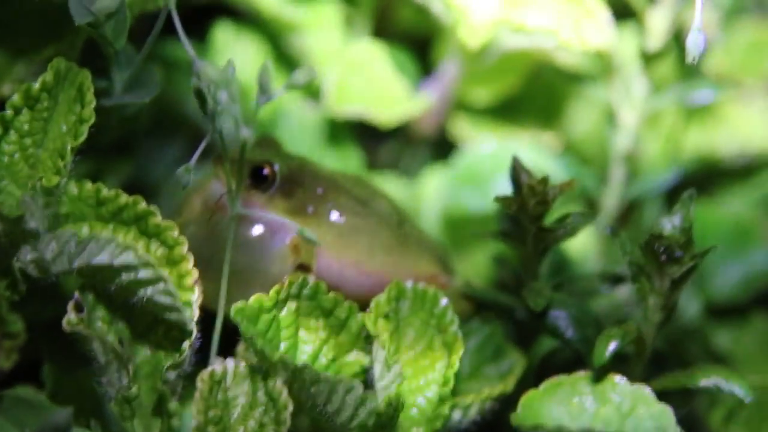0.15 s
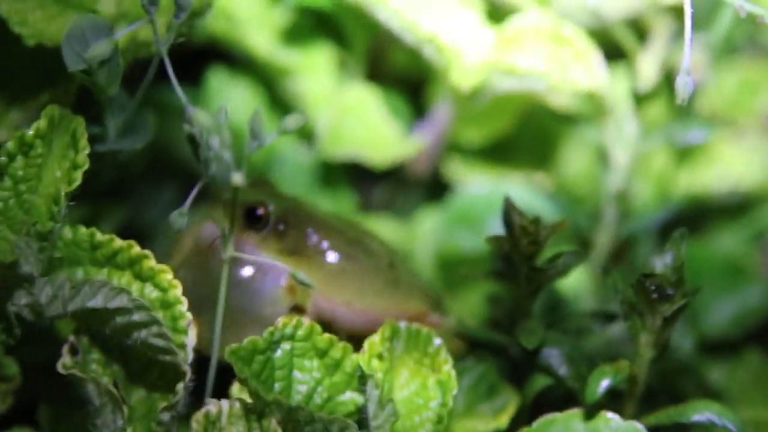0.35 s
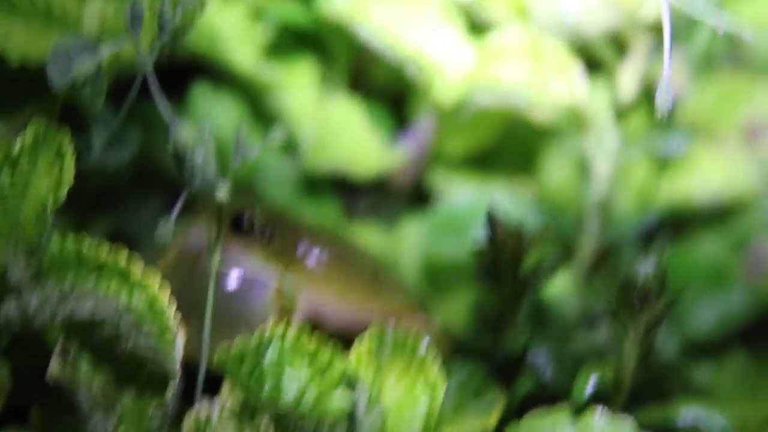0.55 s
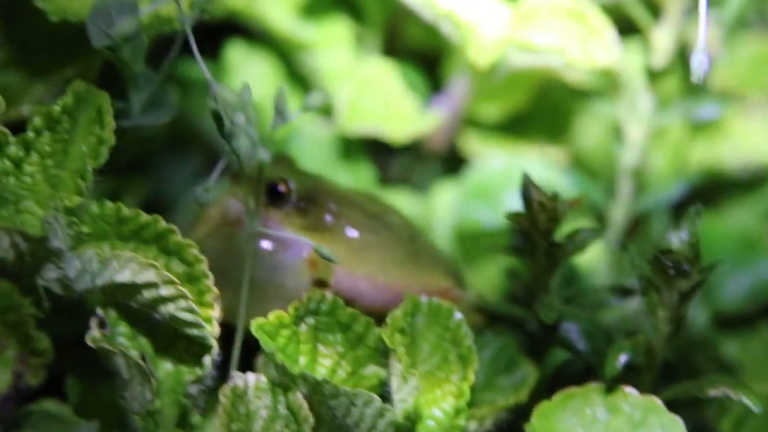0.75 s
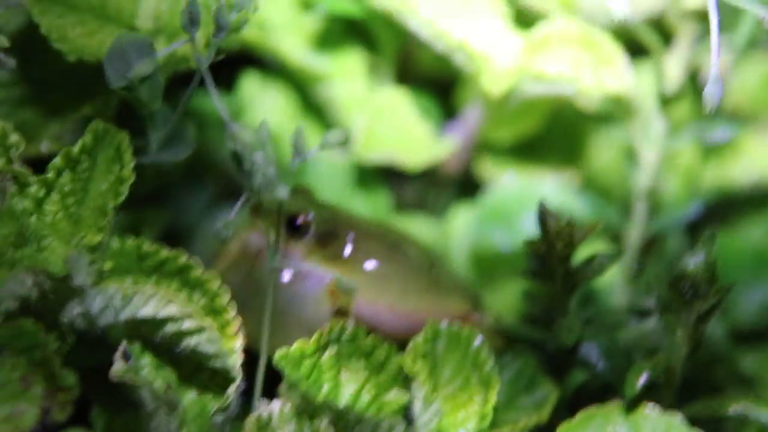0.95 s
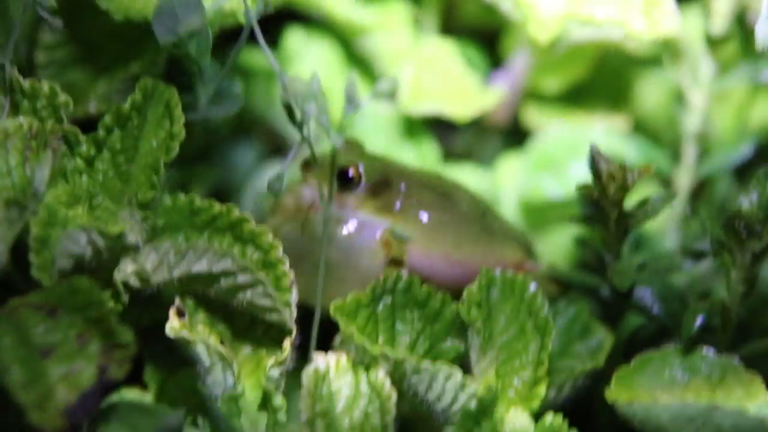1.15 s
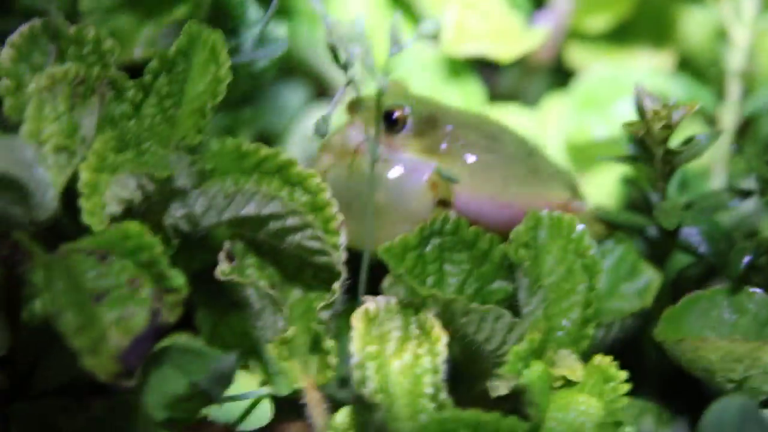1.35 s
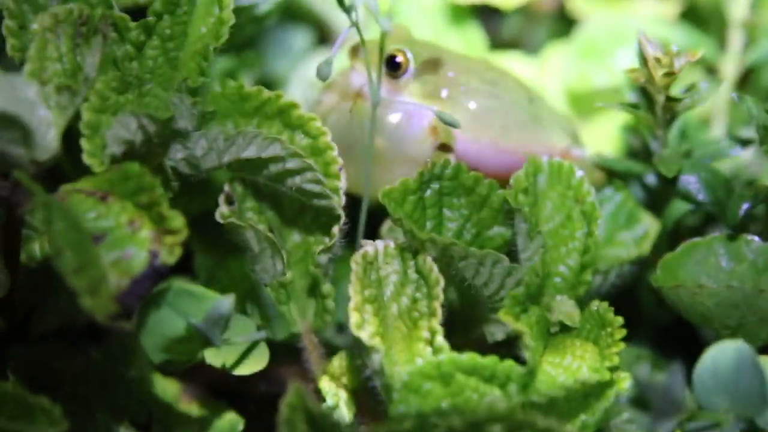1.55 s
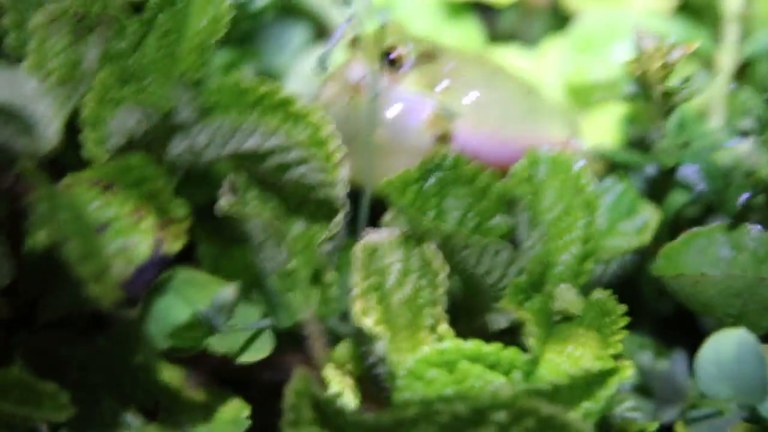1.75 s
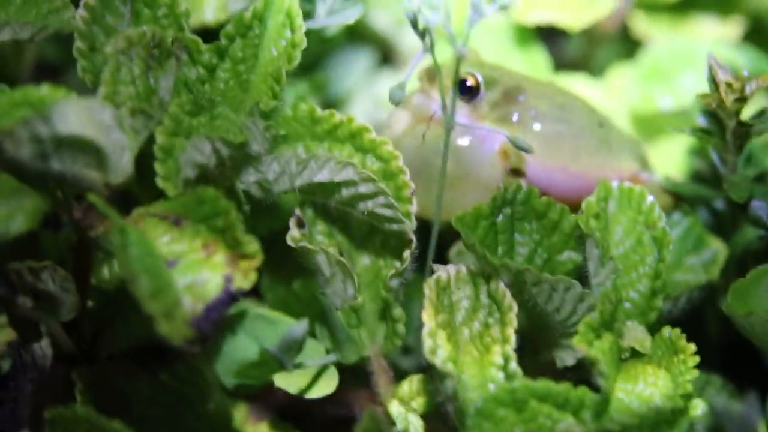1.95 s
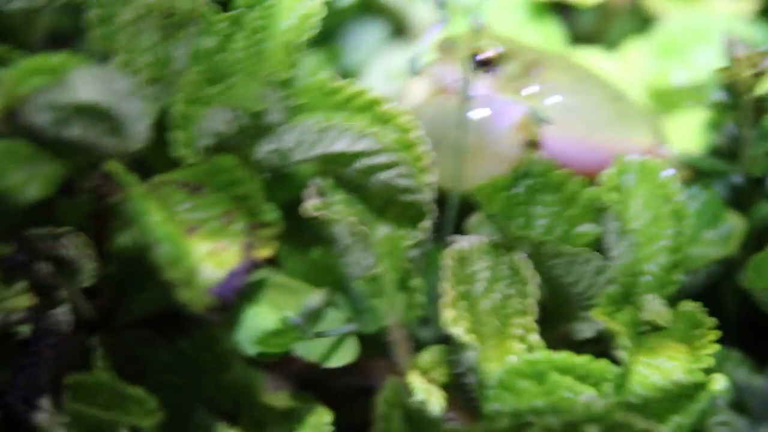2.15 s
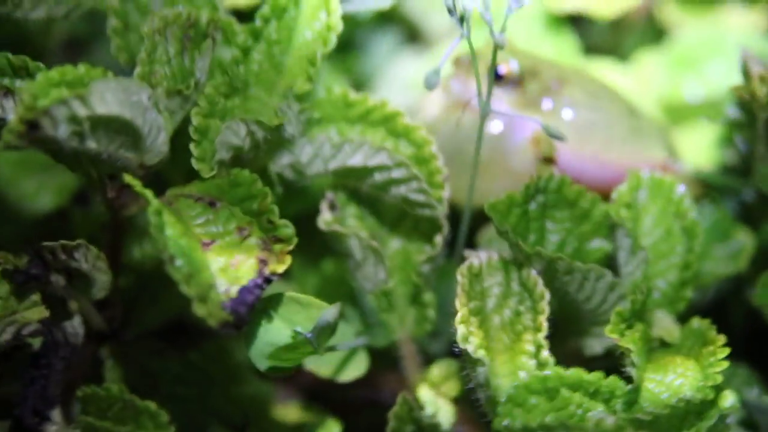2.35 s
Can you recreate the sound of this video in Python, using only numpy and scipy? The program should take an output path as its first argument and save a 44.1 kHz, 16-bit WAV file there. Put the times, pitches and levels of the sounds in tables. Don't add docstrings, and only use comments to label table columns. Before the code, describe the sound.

Near the microphone, a frog clicks hard, the first click distorting and making the background dip. Creaky snaps follow, then the background swells back with leaf rustle, a low toad croak and an accelerating distant frog rattle.

```python
import sys
import numpy as np
from scipy import signal
from scipy.io import wavfile
from scipy.ndimage import uniform_filter1d

SR = 44100
rng = np.random.default_rng(int(sys.argv[2]) if len(sys.argv) > 2 else 0)


def to_linear_factor(level_db):
    exponent = np.asarray(level_db, float) / 20
    return 10 ** exponent


def to_wav(sig):
    pcm = np.clip(np.atleast_2d(sig), -1, 1) * 32767
    pcm = np.round(pcm).astype(np.int16)
    wavfile.write(sys.argv[1], SR, pcm.T)


N = 110250
T = np.arange(N) / SR

# start in seconds, length in seconds, level in dB, pitch in Hz, pulse gap in ms.
LONG_CLICK = (.2493, .0518, 29, 2845, 3.19)
RINGING_CLICKS = [
    (.5203, .025, 28.5, 2815, 3.28),
    (.8175, .020, 25.5, 2782, 3.15),
]
CRISP_CLICKS = [
    (.5673, .027, 29, 2790, 3.1),
    (.8433, .0235, 28, 2765, 3.09),
]
NEIGHBOUR_CLICK = (.393, 0.029, 18.1, 2706, 3.9)
SINGLE_PULSES = [
    (0.3399, .002, 10.2, 2700, 3.6),
    (.438, .002, 0.9, 2696, 3.6),
]
TURNED_CLICKS = [
    (1.2859, 0.0052, 1.1, 2580, 6.9),
    (1.3275, 0.02, 12.5, 2561, 3.4),
]
# start in seconds, level in dB,
# pitch in Hz.
FAR_CLICKS = [(1.466, -22.5, 2500), (1.547, -21, 2270), (2.036, -21, 2476), (2.12, -27, 2790),
              (2.19, -24, 2920), (2.27, -23, 2870), (2.299, -27.5, 3050)]
# multiple of the pitch, level in dB.
OVERTONES = [(1.95, -35), (3.0, -42), (3.9, -48), (5, -49)]
# centre in Hz, width in Hz, level in dB.
RASP_BANDS = [(3750, 500, -4), (4920, 500, -1), (7374, 1100, -5), (10000, 1600, -7.5), (12600, 400, -13),
              (14800, 380, -15)]
SAC_WIDTH_HZ = 1300
LOW_FADE_DB_PER_S = 400

# start in seconds, level in dB.
CREAKS = [(0.616, -14), (0.644, -16), (0.672, -13.5), (0.698, -12), (0.716, -11.5), (.734, -10),
          (0.754, -8.5), (.774, -8.5), (.796, -7.5), (0.882, -30.5), (0.9, -25), (0.916, -15.5),
          (.933, -19), (.947, -19), (.959, -17.5), (0.971, -19), (.982, -9), (.990, -14.5), (.998, -10.5)]
# centre in Hz, width in Hz, level in dB.
CREAK_BODY = [(2313, 270, -5.5), (2080, 520, -20.5), (3820, 310, -21.5), (9400, 2200, -33.5)]

# time in seconds, snaps so far.
RATCHET_COUNT = [(1.848, 0), (1.945, 4), (2.090, 10), (2.114, 11), (2.200, 15), (2.344, 22), (2.361, 23),
                 (2.389, 25), (2.421, 27), (2.491, 31)]
# time in seconds, level in dB.
RATCHET_LEVEL = [(1.85, -22), (2.1, -18.5), (2.3, -16.5), (2.5, -11)]
# centre in Hz, width in Hz, level in dB.
RATCHET_BODY = [(1870, 305, 8), (2745, 710, -4.5), (3780, 690, -11)]

# time in seconds, throbs so far.
THROB_COUNT = [(-.03, 0), (.015, 1), (.147, 4), (.21, 6), (.25, 7), (.725, 16), (.874, 19), (.980, 21),
               (1.260, 27), (1.420, 31), (1.57, 35), (1.655, 36), (1.74, 37), (1.803, 38), (1.855, 39),
               (2.010, 42), (2.245, 47), (2.480, 52), (2.53, 53)]
# time in seconds, level in dB.
TOAD_EFFORT = [(0, -30), (.25, -32.5), (.3, -52.5), (.68, -50), (.75, -34.5), (1, -31.5), (1.2, -27),
               (1.4, -36), (1.5, -50.5), (1.64, -55.5), (1.74, -43.5), (1.9, -39), (2.1, -35), (2.5, -36)]
# centre in Hz, width in Hz, level in dB.
TOAD_THROAT = [(535, 150, -12.5), (1045, 240, -2.5), (1240, 150, -14.5), (1427, 120, 5), (1700, 640, -11.5),
               (2680, 520, -17)]
# centre in Hz, width in Hz, level in dB.
TOAD_BOOM = [(527, 32, -13), (1051, 40, -16), (1425, 30, -8)]
TOAD_PULSES_PER_S, TOAD_ROUGH = 125, 0.55
THROB_DUTY, THROB_GAP_DB = 0.8, -15

# start in seconds, level in dB, dullness from 0 to 1.
TICKS = [(0.028, -24, 0.47), (0.107, -31, 0.56), (0.235, -26, 0.5), (.292, -14, 0.9), (.35, -31, 0.6),
         (.357, -35, 0.4), (0.43, -23, .4), (.472, -30.5, .7), (0.51, -23, 0.8), (1.067, -32, 0.5),
         (1.078, -31, 0.4), (1.149, -37, 0.54), (1.229, -24.5, 0.9), (1.242, -30, 0), (1.409, -39, 0.33),
         (0.563, -11, 0.6), (0.606, -23, 0.97), (1.274, -27, 0.2), (1.283, -16.5, 0.9), (1.307, -25, 0.7),
         (1.311, -19.5, 0.9), (1.387, -28, 0.32), (1.468, -26, 0.25), (1.546, -27, 0.6),
         (2.037, -38.5, 0.4), (2.111, -32.5, 0.4), (2.124, -34.5, 0.6), (2.187, -32.5, 0.66),
         (2.267, -33, 0.34), (2.347, -33, 0.5)]
# time in seconds, level in dB.
RUSTLE_LEVEL = [(1.45, -66), (1.6, -45), (1.7, -43.5), (1.755, -47.5), (1.8, -39.5), (1.84, -50),
                (1.9, -52.5), (2, -66)]
BRUSH_S, BRUSH_LENGTH_S, BRUSH_DB = 1.645, .1, -39

# start in seconds, length in seconds, level in dB, start, lowest and end pitch in Hz.
SQUEAKS = [
    (1.03, .058, -51, 12900, 12600, 14700),
    (1.16, .052, -50, 13200, 10450, 10900),
    (2.189, 0.055, -48.5, 12300, 10900, 13800),
    (2.347, 0.048, -48.5, 12200, 10900, 12600),
]

# centre in Hz, width in Hz, level in dB.
HUM_BANDS = [(2550, 700, -48), (5160, 450, -63), (6800, 1000, -62), (11700, 1000, -65)]
# frequency in Hz, density in dB per Hz.
AIR_COLOUR = [(30, -22), (100, -3.5), (220, -1.5), (400, -10.5), (1500, -13.5), (3500, -28.5),
              (9000, -31.5), (16000, -41.5)]
AIR_DB = -42.5
ECHO_T60_S, ECHO_DB = 0.41, -32.5

# time in seconds, gain in dB.
RECORDER_GAIN = [(.2546, -3.5), (.2562, -25.5), (.272, -24), (.3, -27.5), (.62, -27), (1.05, -27),
                 (1.3, -18), (1.55, -15.5), (1.8, -8.5), (2.05, -1)]
EDGE_HZ = 16000


def evened(x):
    return x / np.sqrt(np.mean(x ** 2) + 1e-20)


def curve(points):
    return np.interp(T, *np.transpose(points))


def add(mix, s, sound):
    part = mix[round(s * SR):][:len(sound)]
    part += sound[:len(part)]


def resonate(x, hz, width):
    turn = np.exp(2j * np.pi * hz * np.arange(len(x)) / SR)
    r = np.exp(-np.pi * width / SR)
    return 2 * (turn * signal.lfilter([1 - r], [1, -r], x / turn + 1e-18)).real


def body(x, peaks):
    out = 0
    for k, (hz, width, db) in enumerate(peaks):
        out = out + (-1) ** k * to_linear_factor(db) * resonate(resonate(x, hz, width), hz, 2 * width)
    return out


def snap(peaks):
    impulse = 1. * (np.arange(900) == 0)
    ring = body(body(impulse, [(2780, 4600, 0)]), peaks)
    return ring / abs(ring).max()


def click(row, ring_ms, rise_ms, ring_db, accent_db, fade_db, last_db, slip, glide, low_db, rasp_db, jitter,
          slowing_ms, over_db, climb, late_ms, low_ratio=.81):
    start, length, level_db, hz, gap_ms = row
    direct, puffs, through_sac = np.zeros((3, round((length + .05) * SR)))
    t = np.arange(1200) / SR
    u = t * 1000 / rise_ms
    ring = (1 - np.exp(-u ** 3)) * np.exp(-t * 1000 / ring_ms)
    shape = (u * np.exp(1 - u)) ** 3 + to_linear_factor(ring_db) * ring
    chance = rng.standard_normal((24, 3))
    k = np.arange(24)
    times = (k * gap_ms + slowing_ms * k ** 2) / 1000
    times = list(times[times < length])
    levels = [fade_db * (s / length) ** 1.1 - accent_db * (s > 0) for s in times]
    times.append(times[-1] + late_ms / 1000)
    levels.append(last_db)
    for n, s, db, (a, b, c) in zip(k, times, levels, chance):
        later = s > 0
        f = hz * (1 + 0.041 * jitter * a + glide * (s / 0.039 - .5))
        at = round((s + later * 0.0018 * jitter * c) * SR) / SR
        phase = 2 * np.pi * (f * t + hz * at + climb * at ** 2 / 2 + slip * n + 0.17 * jitter * a)
        edge = sum(to_linear_factor(d + over_db) * np.sin(m * phase) for m, d in OVERTONES)
        edge = edge + to_linear_factor(low_db - LOW_FADE_DB_PER_S * s) * np.sin(low_ratio * phase)
        size = to_linear_factor(db + 1.5 * jitter * b * later) * shape / shape.max()
        add(through_sac if later else direct, at, size * np.sin(phase))
        add(direct, at, size * edge)
        add(puffs, s, size)
    rasp = evened(body(rng.standard_normal(5000), RASP_BANDS))[:len(puffs)]
    sac = body(through_sac, [(hz, SAC_WIDTH_HZ, 0)])
    return start, to_linear_factor(level_db) * (direct + sac + to_linear_factor(rasp_db) * puffs * rasp)


def reed_frogs():
    out = np.zeros(N)
    for row in RINGING_CLICKS:
        add(out, *click(row, ring_ms=4.34, rise_ms=0.81, ring_db=-2, accent_db=10, fade_db=-13.5, last_db=-57,
                        late_ms=7.8, low_db=-24.5, rasp_db=-37.5, over_db=-5.5, slip=0, climb=2000,
                        glide=.006, jitter=.06, slowing_ms=.004))
    add(out, *click(LONG_CLICK, ring_ms=1.9, rise_ms=0.83, ring_db=-7.5, accent_db=8.5, fade_db=-14.0,
                    last_db=-26, late_ms=6.4, low_db=-28.5, rasp_db=-42.5, over_db=2.5, slip=-.18,
                    climb=2700, glide=.012, jitter=.12, slowing_ms=.012))
    for row, late_ms in zip(CRISP_CLICKS, (5.7, 8.6)):
        add(out, *click(row, ring_ms=1.7, rise_ms=0.89, ring_db=-1, accent_db=7.5, fade_db=-15.5, last_db=-26,
                        late_ms=late_ms, low_db=-34, rasp_db=-37.5, over_db=-1.0, slip=.19, climb=0,
                        glide=.003, jitter=.1, slowing_ms=.012))
    add(out, *click(NEIGHBOUR_CLICK, ring_ms=5.2, rise_ms=1.27, ring_db=-8, accent_db=0, fade_db=-10.5,
                    last_db=-44, late_ms=6.5, low_db=-11, rasp_db=-33.5, over_db=3.5, slip=.12,
                    climb=13900, glide=.012, jitter=.2, slowing_ms=-.07))
    for row in SINGLE_PULSES:
        add(out, *click(row, ring_ms=3.1, rise_ms=0.95, ring_db=5, accent_db=3, fade_db=0, last_db=-41,
                        late_ms=9, low_db=-9.5, rasp_db=-30, over_db=0, slip=0, climb=0,
                        glide=0, jitter=.2, slowing_ms=0))
    for row, low_db in zip(TURNED_CLICKS, (-3, -11)):
        add(out, *click(row, ring_ms=5.5, rise_ms=1.08, ring_db=2, accent_db=8, fade_db=-4, last_db=-33,
                        late_ms=8, low_db=low_db, rasp_db=-36, over_db=-24, slip=0, climb=3500,
                        glide=.015, jitter=.2, slowing_ms=0, low_ratio=.74))
    for s, db, hz in FAR_CLICKS:
        row = (s, .011, db, hz, 3.3)
        add(out, *click(row, ring_ms=3.1, rise_ms=0.67, ring_db=3.5, accent_db=2, fade_db=-25, last_db=-25,
                        late_ms=6.6, low_db=-20, rasp_db=-30, over_db=0, slip=.2, climb=0,
                        glide=0, jitter=1, slowing_ms=0))
    return out


def creaks():
    train = np.zeros(N)
    for s, db in CREAKS:
        add(train, s, to_linear_factor([db]))
    creak = snap(CREAK_BODY[:1] + CREAK_BODY[2:])
    for s in (.002, .0068):
        add(creak, s, to_linear_factor(-5.0) * snap(CREAK_BODY[1:2]))
    sharper = [(hz * 1.017, width, db) for hz, width, db in CREAK_BODY[:1]]
    add(creak, .0045, snap(sharper))
    return signal.oaconvolve(train, creak)[:N]


def ratchet():
    starts = np.diff(np.floor(curve(RATCHET_COUNT)), prepend=0) > 0
    first = np.arange(N) == round(RATCHET_COUNT[0][0] * SR)
    train = starts + 1 * first
    return signal.oaconvolve(train * to_linear_factor(curve(RATCHET_LEVEL)), snap(RATCHET_BODY))[:N]


def toad():
    phase = curve(THROB_COUNT) % 1
    new_throb = np.diff(phase, prepend=0) < 0
    gate = uniform_filter1d(to_linear_factor(np.where(phase < THROB_DUTY, -4 * phase, THROB_GAP_DB)), size=60)
    wander = evened(uniform_filter1d(rng.standard_normal(N), size=400))
    turns = np.cumsum(TOAD_PULSES_PER_S * (1 + .25 * wander)) / SR
    pulses = np.diff(np.floor(turns), prepend=0) + new_throb
    pulses = pulses * to_linear_factor(1.3 * rng.standard_normal(N))
    puffs = np.exp(-(turns % 1) / .5) * rng.standard_normal(N)
    drive = (1 - TOAD_ROUGH) * evened(pulses) + TOAD_ROUGH * evened(puffs)
    strikes = 1. * new_throb
    boom = 0
    for hz, width, db in TOAD_BOOM:
        boom = boom + to_linear_factor(db) * evened(resonate(resonate(strikes, hz, width), hz, 8 * width))
    return to_linear_factor(curve(TOAD_EFFORT)) * (evened(body(gate * drive, TOAD_THROAT)) + boom)


def leaves():
    out, t = np.zeros(N), np.arange(500) / SR
    decay = np.minimum(t / .0005, 1) * np.exp(-t / .002)
    for s, db, dull in TICKS:
        noise = rng.standard_normal(500)
        bright_part = (1 - dull) * body(noise, [(6800, 4100, 2.6)])
        dull_part = dull * 2 * body(noise, [(3600, 2400, 0)])
        add(out, s, to_linear_factor(db) * evened(bright_part + dull_part) * decay)
    clumps = evened(uniform_filter1d(rng.standard_normal(N), size=150))
    grain = to_linear_factor(3 * clumps) * rng.standard_normal(N)
    rustle = evened(body(grain, [(8860, 3100, 2.5), (3000, 3000, 2), (11800, 4400, -4.5)]))
    brush = body(rng.standard_normal(round(BRUSH_LENGTH_S * SR)), [(8300, 2000, 0)])
    add(out, BRUSH_S, to_linear_factor(BRUSH_DB) * evened(brush) * np.hanning(len(brush)))
    return out + to_linear_factor(curve(RUSTLE_LEVEL)) * rustle


def squeaks():
    out = np.zeros(N)
    for start, length, db, start_hz, low_hz, end_hz in SQUEAKS:
        u = np.arange(0, 1, 1 / (length * SR))
        fall = (start_hz - low_hz) * np.clip(1 - u / 0.62, 0, 1) ** 2
        rise = (end_hz - low_hz) * np.clip((u - .35) / 0.7, 0, 1) ** 2
        tone = np.sin(2 * np.pi * np.cumsum(low_hz + fall + rise) / SR)
        flutter = evened(uniform_filter1d(rng.standard_normal(4000), size=60))[:len(u)]
        add(out, start, to_linear_factor(db) * np.sin(np.pi * u ** 1.1) * (1 + 0.52 * flutter) * tone)
    return out


def night():
    hz = np.fft.rfftfreq(1024, 1 / SR)
    a, b, patches = rng.standard_normal((N // 256 + 5, 513, 3)).T
    patches = uniform_filter1d(patches, size=10, axis=0)
    patches = evened(uniform_filter1d(patches, size=8, axis=1))
    colour_hz, colour_db = np.transpose(AIR_COLOUR)
    colour = np.interp(np.log(hz + 1), np.log(colour_hz), colour_db)[:, None]
    spectrum = (a + 1j * b) * to_linear_factor(colour + 2 * patches)
    air = signal.istft(spectrum, nperseg=1024, noverlap=768)[1][:N]
    out = to_linear_factor(AIR_DB) * evened(air)
    for band in HUM_BANDS:
        flicker = to_linear_factor(2.5 * evened(uniform_filter1d(rng.standard_normal(N), size=400)))
        out = out + to_linear_factor(band[2]) * evened(body(flicker * rng.standard_normal(N), [band]))
    return out


def echoes(x):
    t = np.arange(SR // 2) / SR
    scatter = rng.standard_normal(len(t)) * (rng.random(len(t)) < .05)
    tail = scatter * to_linear_factor(-60 * t / ECHO_T60_S) * (t > .004)
    return to_linear_factor(ECHO_DB) * signal.fftconvolve(x, tail / np.linalg.norm(tail))[:N]


def scene():
    near = reed_frogs()
    far = creaks() + ratchet()
    scattered = echoes(near + to_linear_factor(18.5) * far)
    return (near + far + scattered + toad() + leaves() + squeaks() + night())[None]


def band_limit(x):
    return signal.sosfilt(signal.butter(12, 21460, fs=SR, output="sos"), x)


def record(dry):
    clipped = np.clip(dry * to_linear_factor(curve(RECORDER_GAIN)), -1, 1)
    lowpass = signal.firwin(255, EDGE_HZ, fs=SR)[None]
    limited = signal.oaconvolve(clipped, lowpass, "same")
    return band_limit(limited)


dry = scene()
out = record(dry)
to_wav(out)
```